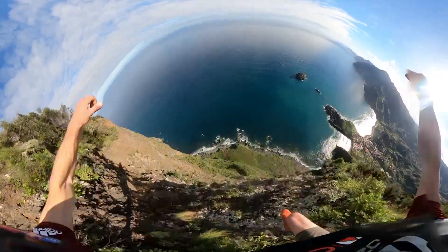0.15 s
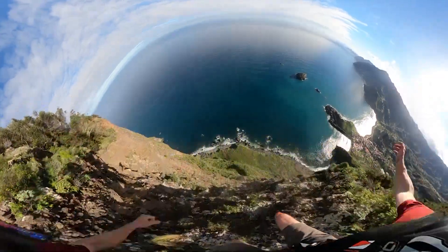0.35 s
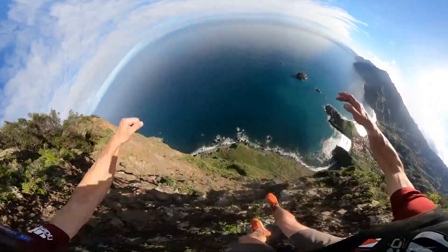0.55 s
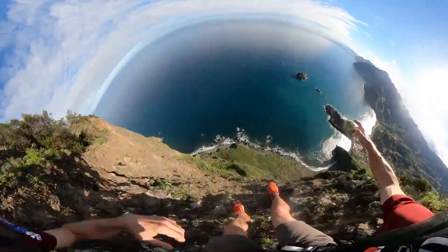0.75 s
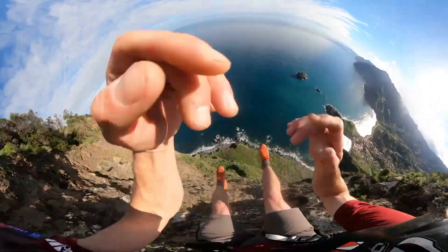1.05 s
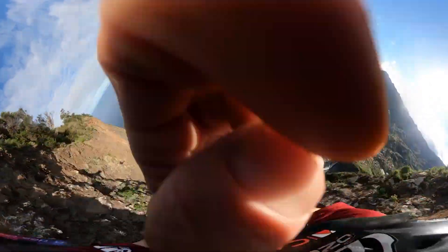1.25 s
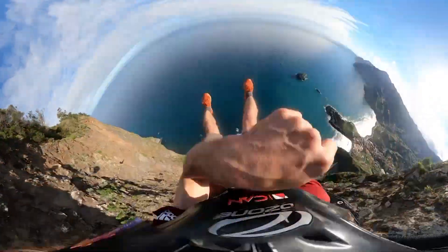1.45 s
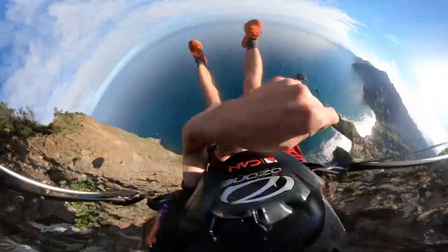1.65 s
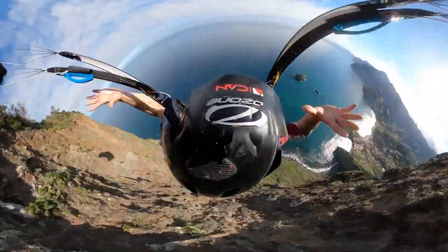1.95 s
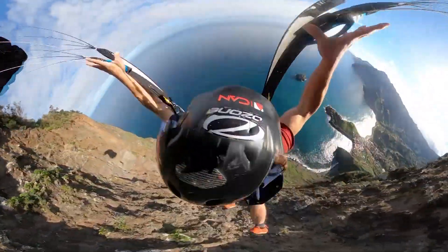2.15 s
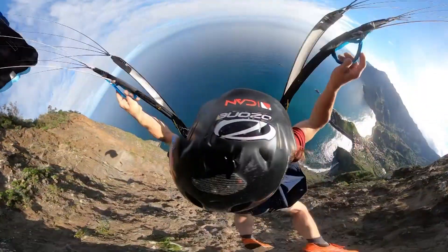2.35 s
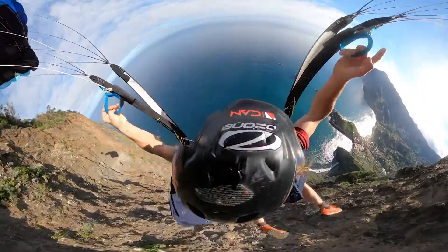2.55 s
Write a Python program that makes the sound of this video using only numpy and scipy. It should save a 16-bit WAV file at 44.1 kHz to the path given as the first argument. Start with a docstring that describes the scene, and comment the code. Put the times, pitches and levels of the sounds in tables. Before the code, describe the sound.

Close, buffeting wind grows as a jumper steps off a sea cliff with a scuff. A parachute rustles out and cracks open at the loudest rush, then the air calms, leaving rustling fabric and small buckle clicks near the microphone.

```python
"""Wind buffets a helmet microphone, harder and harder, as a jumper falls from a sea cliff.
Eddies rumble and flutter right on the microphone, and the fast airstream tears into a roar.
At the start, a body's length below, a gritty scuff and two dull thumps mark the last step.
The parachute rustles out of its pack, flaps and snaps open; the wind eases, and lines and cloth
swish overhead. A faint wash of air and distant surf lies behind it all."""
import sys
import numpy as np
from scipy import signal
from scipy.fft import rfft, irfft
from scipy.io import wavfile
from scipy.ndimage import uniform_filter1d

SR = 44100
rng = np.random.default_rng(int(sys.argv[2]) if len(sys.argv) > 2 else 0)


def output_pcm(signal):
    """Save a mono or channel-first signal as 16-bit PCM at the path in sys.argv[1].

    Samples are clipped to [-1, 1] before scaling.
    """
    pcm = np.clip(np.atleast_2d(signal).T, -1, 1) * 32767
    wavfile.write(sys.argv[1], SR, np.round(pcm).astype(np.int16))


N = 119070
T = np.arange(N) / SR
HZ = np.fft.rfftfreq(N, 1 / SR)


# Large, slow eddies on the microphone (t/s, level/dB) and their spectrum (f/Hz, level/dB)
RUMBLE_LEVEL = [(0, -38), (.05, -33.5), (.17, -34.5), (.27, -22.5), (.45, -19.5), (.55, -23.5), (.6, -17.5),
                (.7, -18), (.74, -19.5), (.79, -16.5), (.9, -20), (1.08, -18), (1.13, -23), (1.23, -18.5),
                (1.41, -13), (1.6, -15.5), (1.69, -14), (1.8, -18.5), (1.95, -14), (2.18, -20),
                (2.24, -30.5), (2.42, -23.5), (2.56, -36.5), (2.7, -36.5)]
RUMBLE_SPECTRUM = [(8, -17.5), (20, 1.5), (40, -2), (70, -0.5), (110, -7.5), (170, -19.5), (300, -60.5),
                   (800, -103)]
# Small, quick eddies on the microphone (t/s, level/dB) and their spectrum (f/Hz, level/dB)
FLUTTER_LEVEL = [(0, -48), (.05, -51), (.17, -45.5), (.26, -32.5), (.36, -35.5), (.48, -41), (.51, -29),
                 (.55, -29.5), (.6, -22), (.73, -36), (.83, -21), (.9, -30.5), (.95, -26), (.985, -32),
                 (1.05, -17.5), (1.12, -32), (1.2, -22.5), (1.27, -33.5), (1.33, -17.5), (1.41, -21.5),
                 (1.48, -18), (1.59, -28), (1.69, -25), (1.77, -27), (1.89, -18.5), (1.99, -27.5),
                 (2.05, -27), (2.18, -30.5), (2.26, -41), (2.37, -45), (2.44, -40), (2.5, -36), (2.56, -50),
                 (2.7, -47)]
FLUTTER_SPECTRUM = [(20, -17), (60, -1.5), (100, 2.5), (200, -1), (300, -11), (450, -30), (800, -46.5),
                    (2000, -87)]

def wind_buffeting():
    """Right on the microphone, large eddies rumble and small ones flutter, swelling together."""
    buffet = lumps(depth_db=1.22, rate_hz=22)
    rumble = steady(noise(RUMBLE_SPECTRUM), samples=2200) * level(RUMBLE_LEVEL)
    flutter = steady(noise(FLUTTER_SPECTRUM), samples=1400) * level(FLUTTER_LEVEL)
    flutter *= lumps(depth_db=0.33, rate_hz=30)
    return buffet * (rumble + flutter)


# Fast airstream past the helmet (t/s, level/dB)
ROAR_LEVEL = [(0, -61), (.9, -51.5), (1.27, -45.5), (1.33, -35.5), (1.42, -34.5), (1.48, -28),
              (1.53, -31.5), (1.61, -35), (1.69, -30), (1.76, -36), (1.85, -29.5), (1.95, -30.5),
              (2.01, -35), (2.11, -41.5), (2.22, -57.5), (2.7, -62.5)]
# Spectra of its roar and of its fine, fizzing turbulence (f/Hz, level/dB)
ROAR_SPECTRUM = [(60, -29), (200, -7.5), (400, 5), (700, -3.5), (1300, -12.5), (2500, -29), (5000, -34.5),
                 (7500, -47.5), (13000, -72.5)]
FIZZ_SPECTRUM = [(400, -15.5), (1200, 4), (2200, -6.5), (3500, -7), (5500, -14.5), (7500, -26.5),
                 (9000, -32), (13000, -52.5)]

def wind_roar():
    """At speed the stream tears into a lumpy roar, brightening as fine turbulence outgrows it."""
    fizz_db, fizz_growth = -40.5, 1.57  # level at the loudest roar; dB gained per dB of roar
    tearing = steady(lumps(depth_db=2.5, rate_hz=110), samples=1800)
    force = level(ROAR_LEVEL)
    roar = force * noise(ROAR_SPECTRUM)
    fizz = amp(fizz_db) * (force / force.max()) ** fizz_growth * noise(FIZZ_SPECTRUM)
    return tearing * (roar + fizz)


# Short noise bursts: gusts on the microphone and the bright crack of the opening canopy
# (t/s, level/dB, half-width/s, tilt/dB per octave)
NOISE_BURSTS = [(0.776, -34.5, 0.0073, -14), (.842, -38, 0.0041, -13), (.948, -28.5, 0.0096, -17.5),
                (1.119, -39.5, 0.0055, -13), (1.191, -30.5, 0.0098, -12.5), (1.062, -35, 0.007, -0.5),
                (1.23, -36, 0.006, 3), (1.3248, -20.5, 0.0047, -15), (1.379, -30.5, 0.009, -5.5),
                (1.472, -19, 0.0025, -2), (1.485, -22.5, 0.0098, -1.5), (1.4946, -18, 0.0038, -0.5),
                (1.657, -26.5, 0.003, 0), (1.684, -27, 0.002, 5.5), (1.692, -20.5, 0.0082, -9),
                (1.799, -31, 0.006, 7), (1.862, -35, 0.0043, 5.5), (1.914, -28.5, 0.003, 6),
                (1.938, -25.5, 0.0051, 2.5), (1.941, -25, 0.013, -5), (2.021, -24.5, 0.0017, 0)]
# Their spectrum before the tilt (f/Hz, level/dB)
BURST_SPECTRUM = [(60, -17.5), (250, 9), (700, 3.5), (1400, -5.5), (2600, -12), (4500, -31.5), (7500, -43),
                  (13000, -65)]

def gusts_and_canopy_crack():
    """Gusts hit and the opening canopy cracks: noise that swells and dies within milliseconds."""
    out = np.zeros(N)
    for at, db, width, tilt_db in NOISE_BURSTS:
        envelope = np.exp(-abs(T - at) / width)
        out += amp(db) * envelope * steady(noise(BURST_SPECTRUM, tilt_db), samples=300)
    return out


# Big eddies hitting the microphone (t/s, peak level/dB, half-width/s)
EDDY_HITS = [(0.587, -16.5, 0.0011), (0.633, -15, 0.0015), (.727, -18, 0.0011), (.949, -12.5, 0.0013),
             (1.233, -6.5, 0.0011), (1.298, -7.5, 0.0021), (1.317, -15.5, 0.00086), (1.714, -10, 0.0019),
             (1.818, -9, 0.0015), (1.971, -12.5, 0.0013), (2.368, -15, .003)]

def eddy_shoves():
    """Each big eddy gives one push of pressure with a shallow, slower rebound."""
    out = np.zeros(N)
    for at, db, width in EDDY_HITS:
        u = (T - at) / width
        push = 2 / (1 + u ** 2)
        rebound = 1 / (1 + (u / 2) ** 2)
        out += amp(db) * (push - rebound)
    return out


# Loose fabric whipping just above the helmet (t/s, peak level/dB, centre f/Hz)
FABRIC_FLAPS = [(1.3265, -26.5, 650), (1.4755, -18.5, 800), (1.493, -32, 1000), (1.4934, -21.5, 795),
                (1.506, -23, 750), (1.6806, -22, 900), (1.6822, -16.5, 1200), (1.683, -24.5, 2120),
                (1.695, -25, 750), (1.7954, -17.5, 2700), (1.7972, -20, 2800), (1.8545, -24, 1000),
                (1.863, -20.5, 900), (1.895, -25, 900), (1.915, -21, 1190), (1.933, -20, 800),
                (1.9381, -11, 695), (1.9404, -22.5, 755), (1.956, -25, 1000), (1.969, -23, 1100)]

def canopy_flaps():
    """Fabric whips over: one steep swing of pressure up and down."""
    out = np.zeros(N)
    for at, db, hz in FABRIC_FLAPS:
        u = 2 * np.pi * hz * (T - at)
        out -= amp(db) * u * np.exp((1 - u ** 2) / 2)
    return out


# Fasteners, lines and canopy, from the pack to overhead (t/s, level/dB, decay/s, tilt/dB per octave)
RIG_SNAPS = [(0.3914, -48, 0.0021, 0), (0.4, -46, 0.0021, -2), (1.2293, -44.5, 0.0029, -3.5),
             (1.411, -34.5, 0.003, -6), (1.429, -49, 0.0023, 8), (1.4417, -32, 0.0009, 3),
             (1.456, -16.5, 0.00084, -7.5), (1.5654, -30, 0.002, -3.5), (1.6795, -41, 0.0034, -1),
             (1.732, -30, 0.0014, -6.5), (1.7941, -24.5, 0.0045, -4), (1.803, -40, 0.0031, 8),
             (1.9125, -31, 0.0039, -2), (1.939, -41, 0.0035, 8), (2.132, -44, .005, -1)]
# Their spectrum before the tilt (f/Hz, level/dB)
SNAP_SPECTRUM = [(200, -26), (1000, -10.5), (2500, -11.5), (4000, -2.5), (7000, -12), (9000, -21.5),
                 (12000, -32), (14500, -40)]

def snaps():
    """Webbing and cloth jerk taut with bright cracks that do not ring."""
    return sum(amp(db) * crack(at, decay) * steady(noise(SNAP_SPECTRUM, tilt_db), samples=100)
               for at, db, decay, tilt_db in RIG_SNAPS)


# The last step, reaching the helmet through the harness (t/s, envelope peak/dB, pitch drop/Hz)
STEP_THUMPS = [(0.3188, -7.5, 1636), (0.347, -16, 1400)]

def thumps():
    """Each dull knock is a short wave whose pitch drops at once into the bass."""
    end_hz, drop_s, drop_power = 41.4, 0.000856, 1.44
    rise_s, decay_s = 0.0025, 0.0042
    out = np.zeros(N)
    for at, db, drop_hz in STEP_THUMPS:
        age = np.maximum(T - at, 0)
        hz = end_hz + drop_hz / (1 + (age / drop_s) ** drop_power)
        phase = 2 * np.pi * np.cumsum(hz * (age > 0)) / SR
        envelope = (1 - np.exp(-(age / rise_s) ** 2)) * np.exp(-age / decay_s)
        out += amp(db) * envelope / envelope.max() * np.sin(phase)
    return out


# Sole on the cliff edge, a body's length from the microphone (t/s, half-width/s, level/dB, f/Hz)
SOLE_RUBS = [(.231, 0.0082, -34, 311), (.288, .018, -34.5, 338)]
# Grit under the sole, brightening as the foot pushes off (t/s, level/dB, centre f/Hz)
GRIT_SCRAPE = [(.17, -75, 3400), (.212, -63, 3300), (.232, -56, 2280), (.25, -64, 3000),
               (.282, -61.5, 4870), (.305, -77, 4760), (.332, -56, 3800), (.37, -77, 3800)]

def scuff():
    """The sole rubs with low fuzzy notes while grit scrapes under it."""
    rubs = np.zeros(N)
    for at, width, db, hz in SOLE_RUBS:
        envelope = np.exp(-((T - at) / width) ** 2)
        note = resonate(rng.standard_normal(N), hz, band_hz=94)
        rubs += amp(db) * envelope * steady(note, samples=900)
    times, grit_db, grit_hz = np.transpose(GRIT_SCRAPE)
    grit = resonate(crackles(per_s=2100), np.interp(T, times, grit_hz), band_hz=1500)
    return rubs + amp(np.interp(T, times, grit_db)) * grit


# Clothing close by and canopy overhead (peak t/s, level/dB, rise/s, fall/s, tilt/dB per octave)
CLOTH_SWISHES = [(.22, -50.5, 0.066, 0.039, -6), (0.322, -56.5, 0.078, 0.13, -3.5),
                 (.59, -55.5, 0.051, 0.056, 0.5), (0.719, -63.5, 0.1, 0.19, 0.5),
                 (1.128, -56, 0.15, 0.39, -2.5), (1.46, -65, .04, 0.12, 14.5),
                 (1.702, -41, 0.073, 0.13, -3), (1.8, -39, 0.019, 0.043, 1),
                 (1.88, -40, 0.057, 0.057, -2.5), (1.94, -37, 0.052, 0.051, 1),
                 (2.03, -41, 0.21, 0.17, -5.5), (2.14, -45.5, 0.055, 0.099, -3),
                 (2.32, -48, 0.14, 0.11, -3), (2.47, -52.5, 0.093, 0.15, -1),
                 (2.571, -50, 0.0058, 0.052, 0), (2.624, -44.5, 0.047, 0.046, 5),
                 (2.675, -51.5, 0.023, 0.031, 3)]
# Their spectrum before the tilt (f/Hz, level/dB)
CLOTH_SPECTRUM = [(200, 0.5), (800, 4), (2000, 6.5), (4500, 4), (7300, -3.5), (8800, -17.5), (11500, -27),
                  (14000, -54)]

def cloth():
    """Fabric rubs in swishes of hiss and tiny crackles, some brighter than others."""
    crackle_db = -2  # against the hiss
    out = np.zeros(N)
    for at, db, rise, fall, tilt_db in CLOTH_SWISHES:
        envelope = np.exp(-((T - at) / np.where(T < at, rise, fall)) ** 2)
        rub = rng.standard_normal(N) + amp(crackle_db) * crackles(per_s=600)
        out += amp(db) * envelope * coloured(rub, CLOTH_SPECTRUM, tilt_db)
    return out * lumps(depth_db=0.5, rate_hz=220)  # crinkling


# Lines and buckles within arm's reach (t/s, level/dB) and their spectrum (f/Hz, level/dB)
RIG_TICKS = [(0.057, -51), (.105, -54), (.578, -48), (0.601, -48.5), (1.511, -46), (1.533, -44),
             (2.407, -40.5), (2.411, -50), (2.44, -43), (2.451, -43), (2.462, -41), (2.468, -40),
             (2.475, -43), (2.486, -44), (2.49, -45), (2.57, -38.5), (2.581, -41), (2.595, -39),
             (2.614, -34), (2.619, -42), (2.631, -35), (2.638, -44), (2.656, -38), (2.664, -34),
             (2.678, -33.5)]
TICK_SPECTRUM = [(500, -16), (2000, -9.5), (3300, -2.5), (4600, 2.5), (6000, -5.5), (7500, -18.5),
                 (9000, -27), (11500, -34), (14000, -59)]

def ticks():
    """Lines and buckles tick in tiny bright bursts, mostly once the canopy is open."""
    envelope = sum(amp(db) * crack(at, decay_s=0.0027) for at, db in RIG_TICKS)
    return envelope * noise(TICK_SPECTRUM)


# Friction bands of the lines just above the microphone (top f/Hz, bandwidth/Hz, level/dB)
ZIP_BANDS = [(2380, 540, -55), (3130, 400, -51.5), (3510, 420, -49), (6600, 850, -63)]

def line_zip():
    """Lines run through their guides; the fuzzy bands rise and sink with their speed."""
    peak_s, half_width_s = 2.315, 0.075
    sag = 0.077  # share of pitch lost as the lines slow down
    speed = np.exp(-((T - peak_s) / half_width_s) ** 2)
    bend = 1 - sag * (1 - speed)
    return speed * sum(amp(db) * resonate(rng.standard_normal(N), hz * bend, band_hz)
                       for hz, band_hz, db in ZIP_BANDS)


# Open air and the surf far below the cliff (t/s, level/dB) and their spectrum (f/Hz, level/dB)
AIR_LEVEL = [(0, -53.5), (.3, -51), (.7, -48.5), (.9, -51.5), (2.3, -48.5), (2.7, -58)]
AIR_SPECTRUM = [(60, -15), (300, 5), (850, 2), (1700, -9), (3500, -16), (6800, -23.5), (9000, -37.5),
                (13000, -60.5)]

def air_and_surf():
    """Moving air and distant surf blend into one faint wash."""
    return level(AIR_LEVEL) * noise(AIR_SPECTRUM)


def amp(db):
    """Decibels to gain."""
    return 10 ** (np.asarray(db) / 20)


def unit(x):
    """Scales to rms 1."""
    return x / np.sqrt(np.mean(x ** 2) + 1e-20)


def level(curve):
    """Gain over time from (t/s, level/dB) points."""
    return amp(np.interp(T, *np.transpose(curve)))


def coloured(x, spectrum, tilt_db=0):
    """Filters x by (f/Hz, level/dB) points, tilted by tilt_db per octave; rms 1."""
    hz, db = np.transpose(spectrum)
    curve = np.interp(np.log(HZ + 1), np.log(hz), db)
    tilt = tilt_db * np.log2(np.clip(HZ, 300, 11000) / 3500)
    return unit(irfft(rfft(x) * amp(curve + tilt), N))


def noise(spectrum, tilt_db=0):
    """Noise with a given spectrum; rms 1."""
    return coloured(rng.standard_normal(N), spectrum, tilt_db)


def lumps(depth_db, rate_hz):
    """Gain that swells and sinks at random, up to about rate_hz; rms 1."""
    wander = unit(irfft(rfft(rng.standard_normal(N)) / (1 + (HZ / rate_hz) ** 4), N))
    return unit(amp(depth_db * wander))


def steady(x, samples):
    """Evens out the slow level of x, so that its envelope alone sets its strength."""
    power = uniform_filter1d(uniform_filter1d(x ** 2, samples), samples)
    return x / np.sqrt(abs(power) + 1e-9)


def crack(at, decay_s, rise_s=0.00088):
    """Envelope with a near-instant rise and an exponential fall."""
    age = np.maximum(T - at, 0)
    return np.minimum(age / rise_s, 1) * np.exp(-age / decay_s)


def crackles(per_s, spread_db=3.5):
    """Sparse tiny clicks of uneven size; rms 1."""
    sizes = amp(spread_db * np.minimum(rng.exponential(1, N), 4))
    signs = rng.choice([-1, 1], N)
    return unit(sizes * signs * (rng.random(N) < per_s / SR))


def resonate(x, hz, band_hz):
    """Passes x twice through a resonance at hz, a number or a curve; rms 1."""
    carrier = np.exp(2j * np.pi * np.cumsum(hz * np.ones(N)) / SR)
    pole = np.exp(-np.pi * band_hz / SR)
    baseband = signal.lfilter([1], [1, -2 * pole, pole * pole], x / carrier)
    return unit((carrier * baseband).real)


def scene():
    """One microphone on the helmet, in open air; all but the surf is close."""
    wind = wind_buffeting() + wind_roar() + eddy_shoves()
    bursts = gusts_and_canopy_crack() + canopy_flaps() + snaps()
    last_step = thumps() + scuff()
    gear = cloth() + ticks() + line_zip()
    return (wind + bursts + last_step + gear + air_and_surf())[None]


def record(dry):
    """The microphone overloads softly on the largest buffets, then the top treble is cut."""
    ceiling, cutoff_hz = 0.54, 13300
    saturated = dry / (1 + (dry / ceiling) ** 4) ** (1 / 4)
    lowpass = signal.firwin(255, cutoff_hz, window=("kaiser", 8), fs=SR)
    return signal.oaconvolve(saturated, lowpass[None], "same")


dry = scene()
out = record(dry)
output_pcm(out)
```